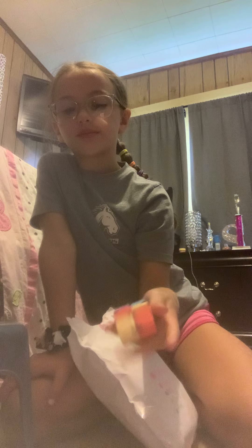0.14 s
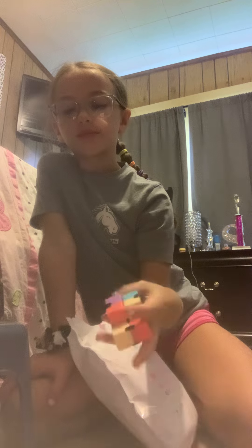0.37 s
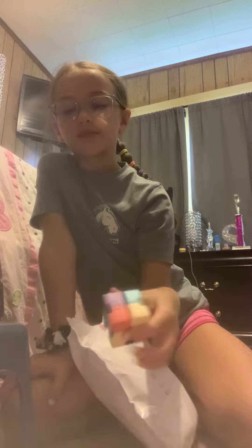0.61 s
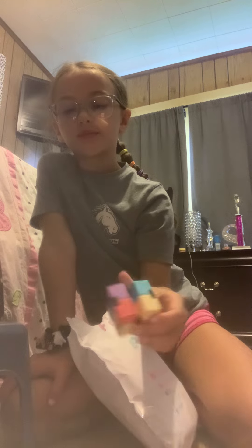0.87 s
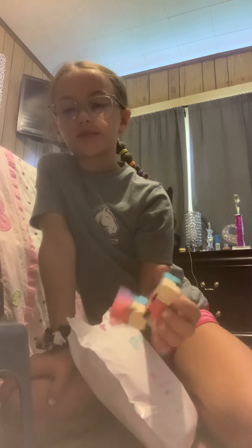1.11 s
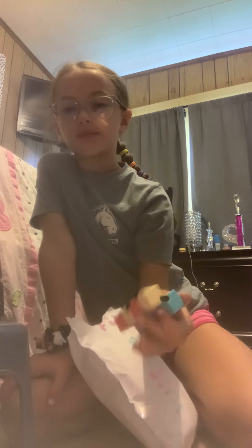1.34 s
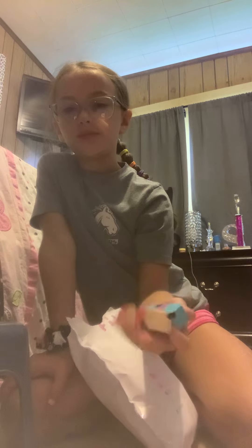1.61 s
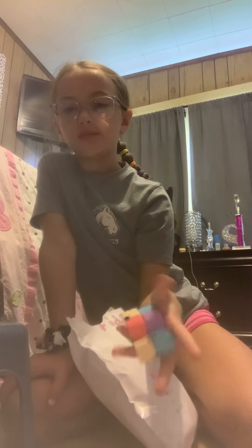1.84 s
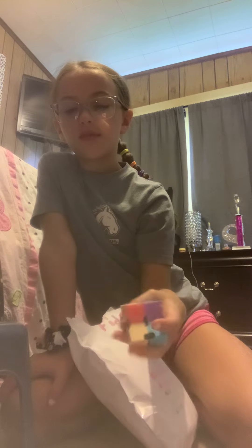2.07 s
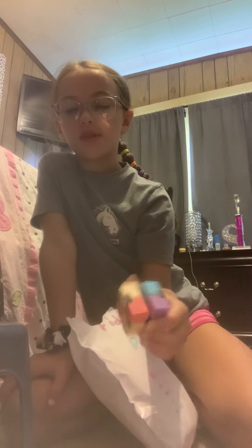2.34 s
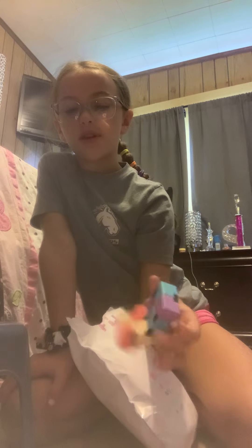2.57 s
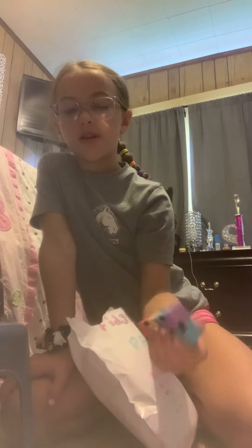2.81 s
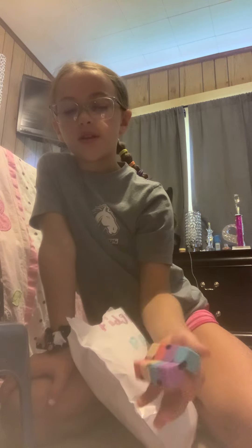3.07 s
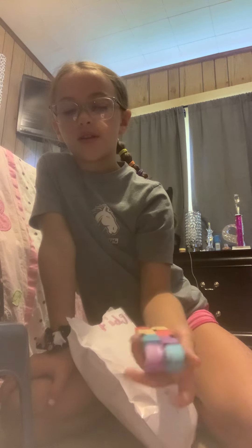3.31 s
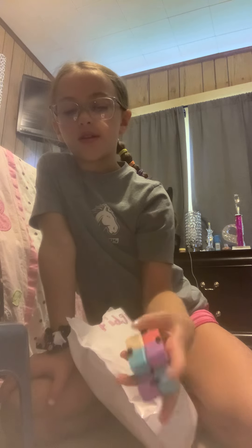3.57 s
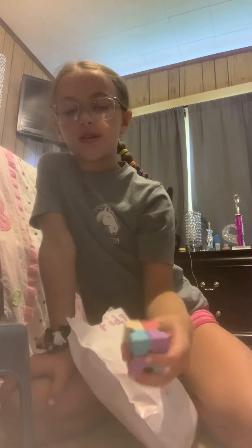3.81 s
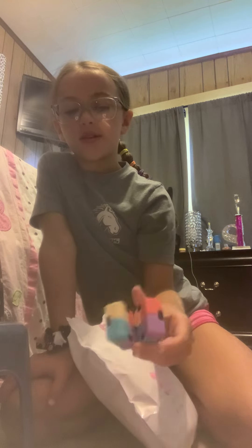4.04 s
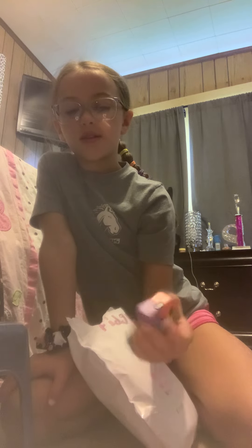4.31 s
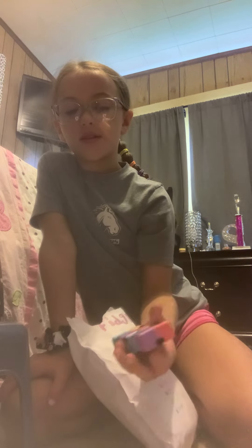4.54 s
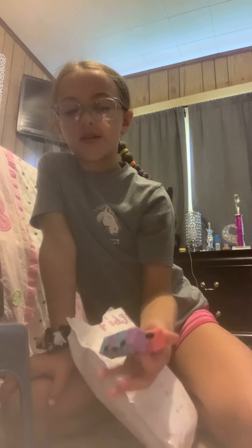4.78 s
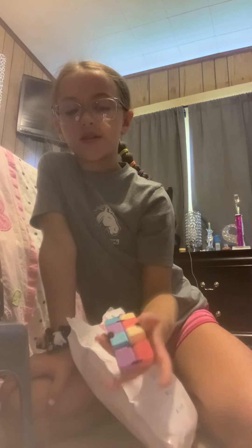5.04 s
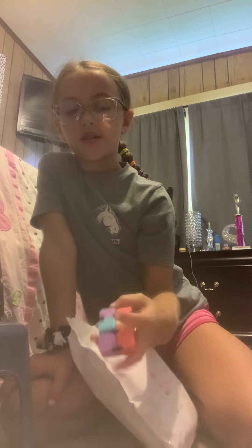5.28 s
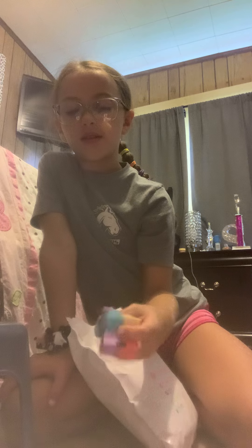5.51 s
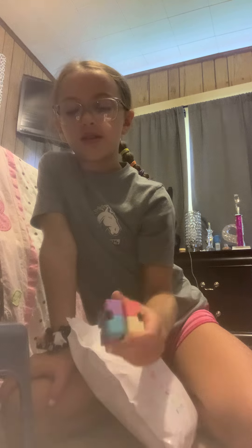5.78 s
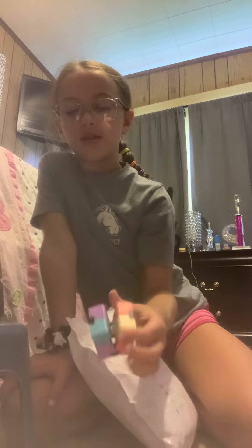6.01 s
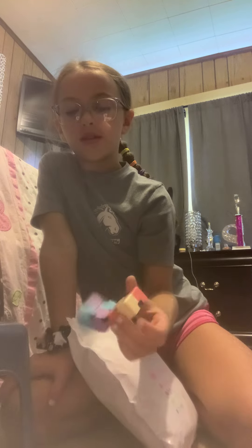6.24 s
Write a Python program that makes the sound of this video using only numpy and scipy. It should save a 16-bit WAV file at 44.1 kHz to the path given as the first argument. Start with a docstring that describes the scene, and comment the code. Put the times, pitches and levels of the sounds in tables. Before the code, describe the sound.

A small hinged plastic cube toy is folded in one hand, clacking sharply and chattering in irregular clicks over a faint air conditioner hum.

```python
"""Folding cube toy in a bedroom

A hinged plastic cube toy is folded over and over in one hand, close to a microphone, in a small furnished bedroom.
Its hollow blocks clap together in short chattering bursts: each contact strikes a set of decaying sines.
Loose hinges rattle around the claps as random ticks, and the walls answer briefly with noise-like echoes.
An air conditioner hums with wavering tones and rumbles with coloured noise behind.
"""
import sys
import numpy as np
from scipy import signal
from scipy.fft import rfft, irfft
from scipy.io import wavfile
from scipy.ndimage import map_coordinates

SR = 44100
rng = np.random.default_rng(int(sys.argv[2]) if len(sys.argv) > 2 else 0)


def master(y):
    """Save y as 16-bit WAV."""
    cut = np.clip(np.atleast_2d(y).T, -1, 1)
    pcm = np.round(cut * 32767)  # scale
    wavfile.write(sys.argv[1], SR, pcm.astype(np.int16))


def ratio_of_db(decibels):
    """Turn decibels (scalar or array-like) into linear amplitude factors; 0 dB maps to 1."""
    return 10 ** (np.asarray(decibels, float) / 20)


N = 281358   # length in samples

# Blocks clapping together; flat faces knock, corners only snap.
# Each row: time in seconds, peak of the edge snap in dB, peak of the hollow knock in dB.
CLAP_TIMES = [(0.0014, -36, -49), (0.022, -44.5, -48), (0.045, -12, -35), (0.204, -39.5, -54),
              (0.2094, -29.5, -44.5), (0.2797, -40.5, -45.5), (0.41, -51.5, -54.5), (0.4704, -51, -50.5),
              (0.4968, -25.5, -36), (0.5589, -32, -39.5), (0.5842, -32.5, -68), (0.7107, -29.5, -42),
              (0.7233, -27.5, -47.5), (0.798, -45.5, -53), (0.886, -36.5, -47.5), (0.926, -57, -52),
              (0.941, -37, -61), (0.954, -45, -72), (1.0798, -44, -44.5), (1.134, -50, -61),
              (1.166, -47.5, -48.5), (1.177, -26.5, -43), (1.2694, -49, -52.5), (1.3642, -48, -55.5),
              (1.39, -45.5, -61.5), (1.578, -39.5, -50.5), (1.5846, -26.5, -48.5), (1.6439, -12.5, -27.5),
              (1.7862, -37, -53), (1.8031, -37.5, -48.5), (1.85, -39.5, -46.5), (1.888, -36, -46),
              (1.9113, -43.5, -56), (1.9295, -42, -55), (2.0168, -51, -46), (2.0258, -34.5, -42),
              (2.0926, -29.5, -32), (2.106, -27.5, -45), (2.138, -35.5, -37.5), (2.148, -25.5, -37.5),
              (2.1569, -31.5, -35), (2.2355, -44, -51.5), (2.3276, -47, -48.5), (2.347, -50, -61),
              (2.488, -49, -52), (2.532, -77, -57.5), (2.6123, -40, -44), (2.6227, -34, -46),
              (2.7312, -50.5, -54), (2.75, -38.5, -49), (2.8802, -49.5, -58), (3.0024, -43, -55),
              (3.178, -32.5, -51.5), (3.204, -33.5, -49), (3.248, -12.5, -31.5), (3.376, -37.5, -49.5),
              (3.434, -36, -51), (3.4887, -49.5, -63), (3.6496, -41.5, -51), (3.6596, -37, -45),
              (3.697, -36, -54), (3.73, -29, -34), (3.796, -36, -47.5), (3.8137, -40, -38),
              (3.8522, -50.5, -51), (3.864, -46, -47.5), (3.9383, -37, -47.5), (3.9614, -34, -53),
              (3.9649, -20.5, -31), (4.0063, -47.5, -54), (4.141, -43.5, -55), (4.165, -43.5, -51.5),
              (4.2253, -35.5, -42.5), (4.258, -29.5, -43), (4.415, -55, -58), (4.4526, -36, -58.5),
              (4.538, -55.5, -56), (4.5924, -51, -58), (4.607, -43.5, -59), (4.6215, -37, -55),
              (4.628, -36.5, -50), (4.8227, -39.5, -53.5), (4.844, -43.5, -56), (4.891, -45, -59),
              (4.9478, -14.5, -34), (5.0098, -37.5, -52), (5.0988, -42.5, -56.5), (5.14, -45, -69),
              (5.188, -64, -55), (5.202, -38, -64), (5.2195, -32.5, -47.5), (5.252, -58, -55),
              (5.332, -40.5, -51), (5.3785, -34, -47.5), (5.4697, -35.5, -50), (5.479, -31, -45),
              (5.4992, -49, -46.5), (5.5668, -47.5, -55), (5.5916, -44, -57.5), (5.7182, -32, -40.5),
              (5.725, -34, -58), (5.7392, -16, -30), (5.7796, -41, -47.5), (5.8987, -30, -43),
              (5.9517, -49, -57), (5.967, -42.5, -62), (5.998, -63, -57), (6.0685, -40, -54.5),
              (6.1134, -37, -45.5), (6.1857, -38, -51), (6.2872, -39.5, -45)]
# What a block rings with. Each row: pitch in Hz, relative level in dB.
BLOCK_MODES = [(800, -8), (1100, -6), (1600, 1.5), (2250, 3.5), (2800, 0), (3400, -0.5), (4100, -2),
               (4800, 3.5), (5600, 1), (6800, 1), (7400, 0.5), (8000, 2), (8800, 0), (9600, 2),
               (10300, -1.5), (11500, -2.5), (13000, -7), (14700, -4)]
# Pitches in Hz that split the modes into the hollow (lowest), the walls and the edges (highest).
PART_LIMITS_HZ = [3000, 6000]
# Plastic damps the high modes fastest. Each row: pitch in Hz, time to fall by 60 dB in milliseconds.
BLOCK_DECAY = [(1000, 7.1), (15000, 2.1)]
# Early answers of the room. Each row: delay in milliseconds, level in dB, smear in milliseconds.
ROOM_ECHOES = [(6.0, -12.5, 3.5), (13.2, -9.5, 2.8)]
# How long the room rings. Each row: pitch in Hz, time to fall by 60 dB in seconds.
ROOM_DECAY = [(1000, 0.062), (3000, 0.15), (8500, 0.14), (15000, 0.16)]
# Compressor and fan tones. Each row: pitch in Hz, level before wavering in dB rms.
HUM_TONES = [(59.2, -55.5), (75.2, -60.5), (118.4, -66), (150.5, -66), (177.6, -67), (236.9, -72.5),
             (301, -72.5)]
# Colour of the moving air. Each row: pitch in Hz, relative level in dB per Hz.
AIR_COLOUR = [(30, -25), (48, -5), (75, -2.5), (170, -6.5), (550, -20), (800, -30), (1300, -35.5),
              (2100, -36.5), (3500, -46), (6000, -46), (8500, -42), (16000, -48.5)]

MODE_HZ, MODE_DB = np.array(BLOCK_MODES).T


def rms_one(x):
    """Scale to unit rms."""
    return x / np.sqrt(np.mean(x ** 2) + 1e-20)


def at_hz(points, hz):
    """Read a table between its rows, on a log-frequency axis."""
    table_hz, values = np.array(points).T
    return np.interp(np.log(hz + 1), np.log(table_hz), values)


def drift(per_second):
    """Slow random curve: a smooth line through random points, so many per second."""
    knots = rng.standard_normal(400)
    return map_coordinates(knots, [np.arange(N) / SR * per_second], order=3, mode="wrap")


def ringing(hz, longer, rise_ms, size):
    """One decaying sine per mode of a block, a row each; the contact takes a moment to build."""
    ms = 1000 * np.arange(size) / SR
    decay_ms = longer * at_hz(BLOCK_DECAY, hz)
    fall = ratio_of_db(MODE_DB[:, None] - 60 * ms / decay_ms)
    rise = 1 - np.exp(-ms / rise_ms)
    return fall * rise * np.sin(2 * np.pi * hz * ms / 1000)


def one_block(gentle, luck, colour_luck, free_mode, focus_db, linger, detune, colour_db):
    """Modes of one clap: blocks differ a little in pitch; gentle claps show more of their own colour."""
    near = (np.arange(len(MODE_HZ)) == free_mode)[:, None]
    pitch_hz = (MODE_HZ * (1 + detune * luck))[:, None]
    # hard claps gather their edge modes around 9200 Hz, losing 15 dB per octave squared
    octaves = np.log2(pitch_hz / 9200) * (pitch_hz > PART_LIMITS_HZ[1])
    centre_db = -octaves ** 2 * 15 * (1 - gentle)
    own_db = gentle * (focus_db * near + colour_db * colour_luck[:, None])
    return ratio_of_db(centre_db + own_db) * ringing(pitch_hz, 1 + gentle * linger * near, rise_ms=0.16, size=400)


def claps(chatter_ms, slower_ms, spread_db, focus_db, linger, detune, colour_db):
    """Faces never meet flat: each clap is a few contacts that swell and fade, each striking the modes anew.
    Returns the sound toward the microphone and the evener blend of all directions that the room hears."""
    size, contacts, pad = 400, 7, 400   # ring length in samples, contacts per clap, margin in samples
    modes = len(MODE_HZ)
    out = np.zeros((2, N + 4 * size))
    part_of = np.digitize(MODE_HZ, PART_LIMITS_HZ)   # 0 hollow, 1 walls, 2 edges
    turns = (-1.) ** np.arange(modes)
    loud_edges = np.flatnonzero((part_of == 2) & (MODE_DB > 0))
    for s, snap_db, knock_db in CLAP_TIMES:
        # the walls ring between the two, with a little chance
        wall_db = 0.33 * snap_db + 0.67 * knock_db - 2.5 + rng.uniform(-0.5, 0.5)
        gentle = np.clip(-snap_db / 34, 0, 1) ** 2   # 0 hard, 1 gentle
        free_mode = rng.choice(loud_edges)           # the edge mode that the fingers leave undamped
        rings = one_block(gentle, rng.standard_normal(modes), rng.standard_normal(modes),
                          free_mode, focus_db, linger, detune, colour_db)

        # when each contact falls, as a share of the chatter after its height
        late = (np.arange(contacts) + rng.random(contacts)) / contacts - 0.3
        luck = rng.standard_normal((contacts, modes))
        strength = np.sign(luck) * ratio_of_db(spread_db * np.abs(luck) - 18.8 * np.abs(late)[:, None])
        burst_ms = np.clip(chatter_ms - slower_ms * snap_db / 10, 1, 12)   # gentle claps close more slowly
        starts = pad + (late * burst_ms * SR / 1000).astype(int)

        at = round(s * SR)
        for k, peak_db in enumerate((knock_db, wall_db, snap_db)):
            mine = part_of == k
            part = np.zeros(size + 2 * pad)
            for start, ring in zip(starts, strength[:, mine] @ rings[mine]):
                part[start:start + size] += ring
            part *= ratio_of_db(peak_db) / np.abs(part).max()
            out[0, at:at + len(part)] += part
            # the room gets one strike of the same energy, with neighbouring modes in opposite sign
            blend = turns[mine] @ rings[mine]
            blend *= np.sqrt(np.sum(part ** 2) / np.sum(blend ** 2))
            out[1, at + pad:at + pad + size] += blend
    return out[:, pad:pad + N]


def rattle(idle_db, level_db, follow, lead_ms, trail_ms, per_s, size_db, tilt_db):
    """Loose hinges tick at random while a block swings toward a clap and settles after it."""
    ms = np.arange(-4000, 4001) * 1000 / SR
    swing = np.exp(np.where(ms < 0, ms / lead_ms, -ms / trail_ms))
    motion = np.zeros(N)
    for s, snap_db, _ in CLAP_TIMES:
        motion[round(s * SR)] = ratio_of_db(level_db + follow * snap_db)
    loudness = ratio_of_db(idle_db) + signal.fftconvolve(motion, swing, "same")

    born = rng.random(N) < per_s * ratio_of_db(6.0 * drift(40)) / SR   # ticks come thick and thin
    touches = born * ratio_of_db(size_db * np.minimum(rng.exponential(1, N), 4))

    # sixteen kinds of tick, each its own mix of the block's modes, weaker below 8 kHz
    hz = MODE_HZ[:, None]
    tilt = ratio_of_db(tilt_db * np.minimum(np.log2(hz / 8000), 0))
    rings = tilt * ringing(hz, 1, rise_ms=0.17, size=400)
    shape = (16, len(MODE_HZ))
    mixes = rng.standard_normal(shape) ** 2 * rng.choice([-1, 1], shape)
    kinds = mixes @ rings
    dealt = rng.integers(0, len(kinds), N)
    ticks = sum(signal.oaconvolve(touches * (dealt == k), ring)[:N] for k, ring in enumerate(kinds))
    return loudness * rms_one(ticks)


def bedroom(x):
    """Grainy echoes from ceiling and walls over a diffuse tail that builds up, then dies band by band."""
    t = np.arange(SR // 3) / SR
    edges = 500 * 2 ** np.arange(0, 5.2, 0.5)   # half-octave bands, Hz
    tail = np.zeros(len(t))
    for low, high in zip(edges, edges[1:]):
        band_pass = signal.butter(2, [low, high], "band", fs=SR, output="sos")
        band = signal.sosfilt(band_pass, rng.standard_normal(len(t)))
        tail += band * ratio_of_db(-60 * t / at_hz(ROOM_DECAY, np.sqrt(low * high)))
    tail *= np.clip(t / 0.014, 0, 1) ** 2       # builds up over 14 ms
    tail *= ratio_of_db(-9.5) / np.sqrt(np.sum(tail ** 2))
    for delay_ms, db, smear_ms in ROOM_ECHOES:
        grains = rng.standard_normal(len(t)) ** 3   # cubing leaves a few strong spikes
        puff = np.exp(-((1000 * t - delay_ms) / smear_ms) ** 2) * grains
        tail += ratio_of_db(db) * puff / np.sqrt(np.sum(puff ** 2))
    return signal.fftconvolve(x, tail)[:N]


def air_conditioner(waver_db, waver_cycles):
    """Tones that waver, the higher the more in phase, over the rumble and hiss of moving air."""
    t = np.arange(N) / SR
    tones = np.zeros(N)
    for hz, db in HUM_TONES:
        level = np.sqrt(2) * ratio_of_db(db + waver_db * drift(4.2))   # root 2 turns rms into peak
        waver = waver_cycles * hz / HUM_TONES[0][0] * drift(4)
        tones += level * np.sin(2 * np.pi * (hz * t + rng.random() + waver))
    colour = ratio_of_db(at_hz(AIR_COLOUR, np.fft.rfftfreq(N, 1 / SR)))
    air = irfft(rfft(rng.standard_normal(N)) * colour, N)
    return tones + ratio_of_db(-58.5) * rms_one(air)


def scene():
    """Toy, room and air conditioner at one microphone."""
    toy = claps(chatter_ms=4.5, slower_ms=0.8, spread_db=1.0, focus_db=1.0,
                linger=0.96, detune=0.014, colour_db=2.5)
    toy = toy + rattle(idle_db=-77.5, level_db=-43.5, follow=0.58, lead_ms=6.3,
                       trail_ms=19, per_s=600, size_db=4.0, tilt_db=2.5)
    # small blocks radiate no bass
    toy = signal.sosfilt(signal.butter(4, 800, "high", fs=SR, output="sos"), toy)
    direct, toward_room = toy
    mix = direct + bedroom(toward_room) + air_conditioner(waver_db=1.5, waver_cycles=0.044)
    return mix[None]   # one channel


def top_cut(x):
    """Nothing passes above the cut-off."""
    return signal.sosfilt(signal.butter(12, 16980, fs=SR, output="sos"), x)


def record(dry):
    """The microphone weakens the lowest bass, below about 42 Hz."""
    low_cut = signal.butter(4, 41.8, "high", fs=SR, output="sos")
    mix = signal.sosfilt(low_cut, dry)
    return top_cut(mix)


dry = scene()
out = record(dry)
master(out)
```